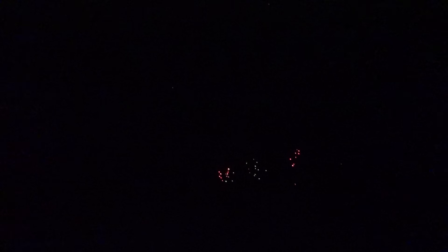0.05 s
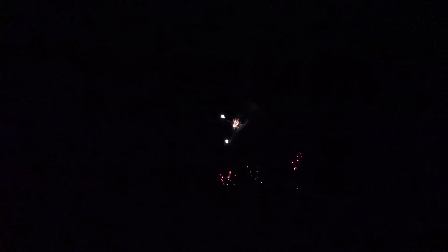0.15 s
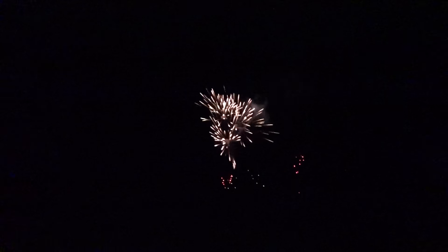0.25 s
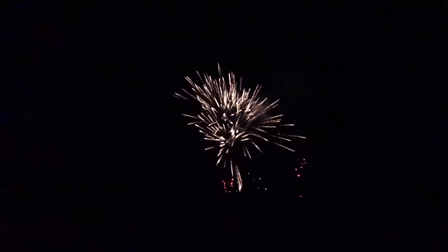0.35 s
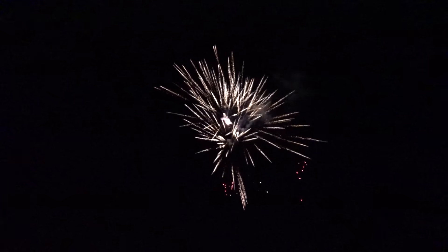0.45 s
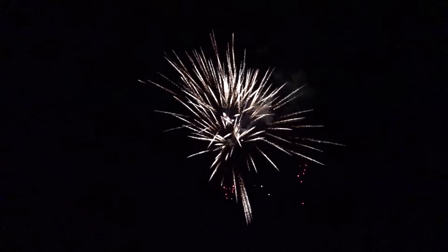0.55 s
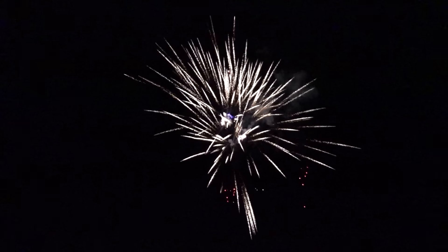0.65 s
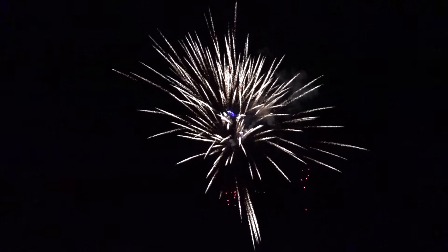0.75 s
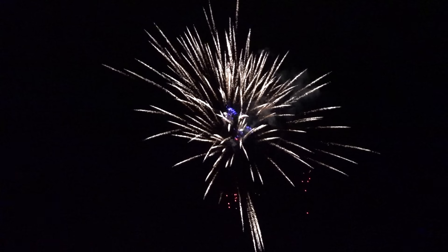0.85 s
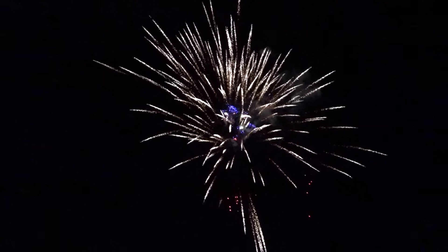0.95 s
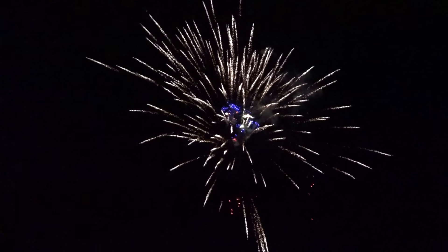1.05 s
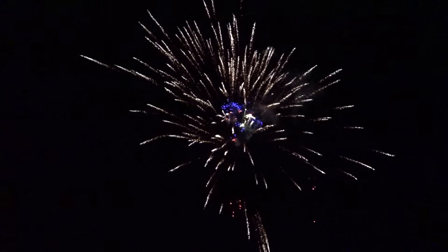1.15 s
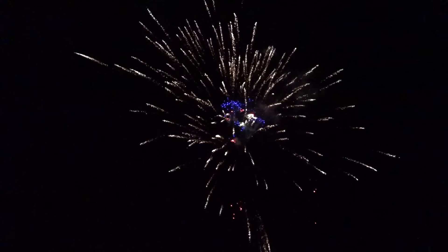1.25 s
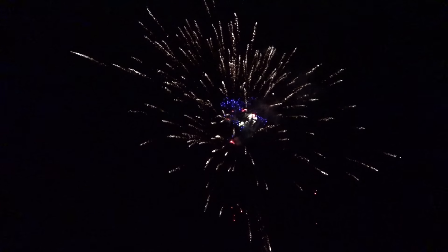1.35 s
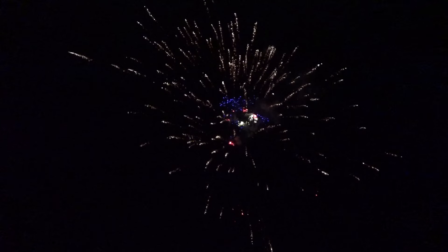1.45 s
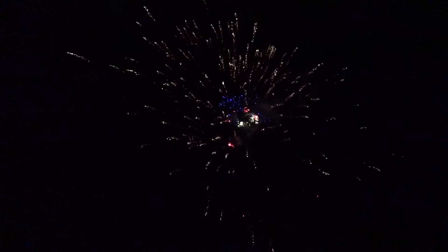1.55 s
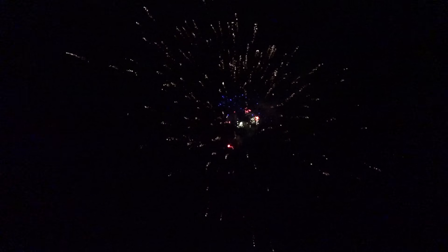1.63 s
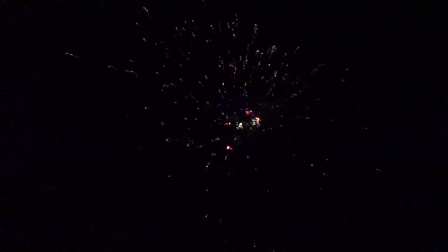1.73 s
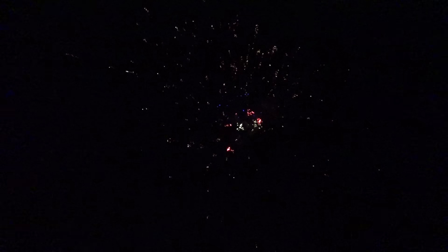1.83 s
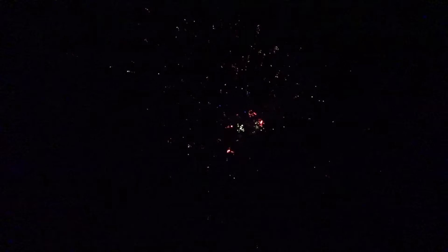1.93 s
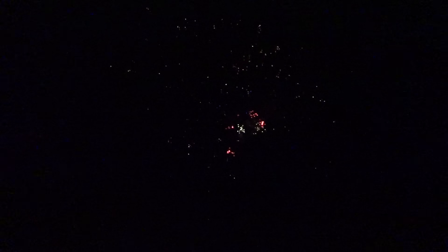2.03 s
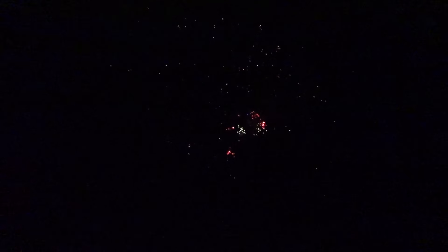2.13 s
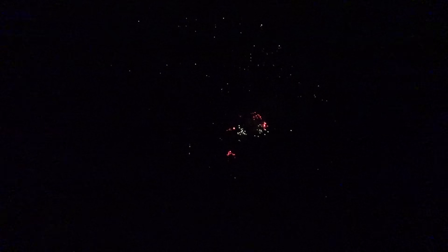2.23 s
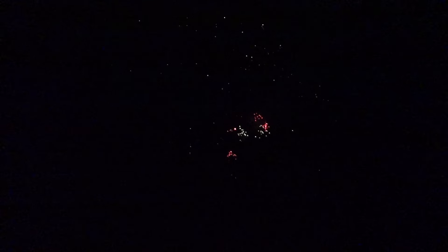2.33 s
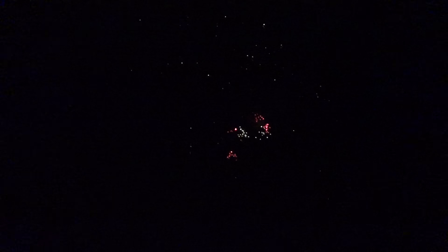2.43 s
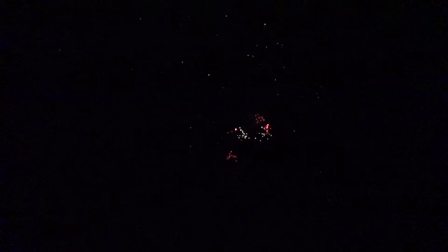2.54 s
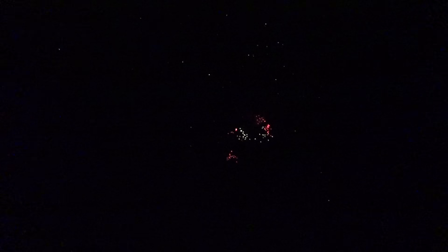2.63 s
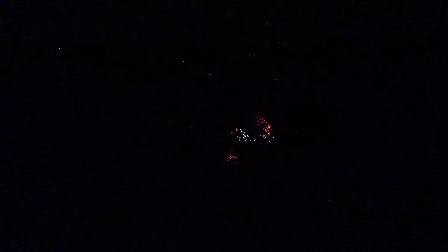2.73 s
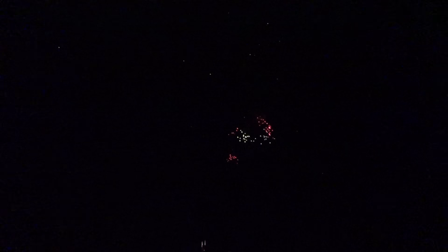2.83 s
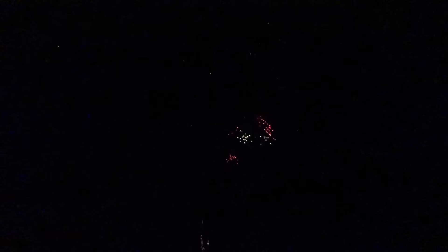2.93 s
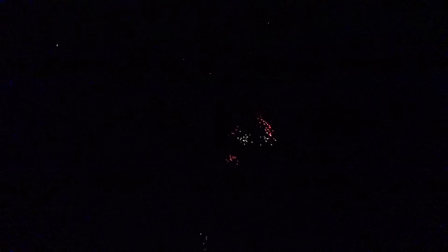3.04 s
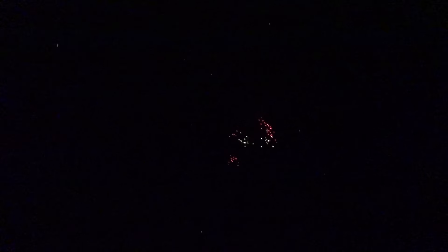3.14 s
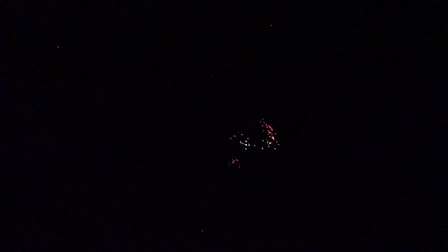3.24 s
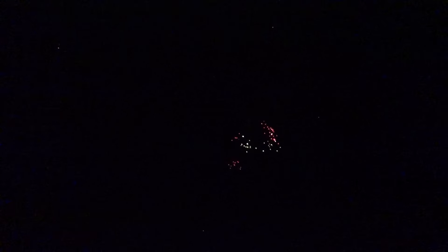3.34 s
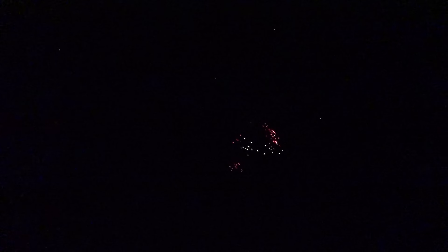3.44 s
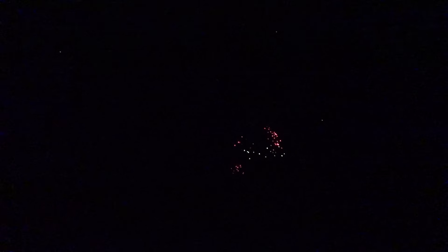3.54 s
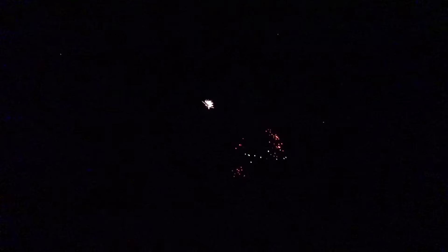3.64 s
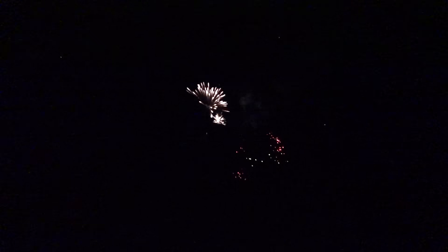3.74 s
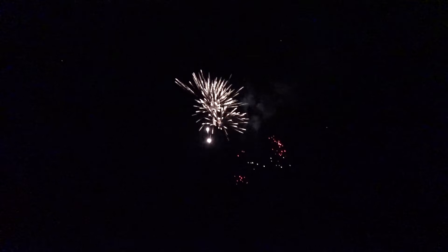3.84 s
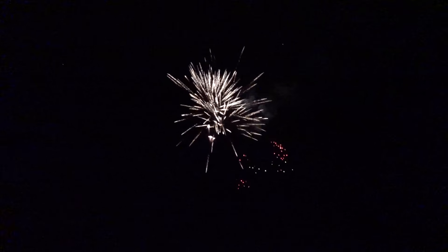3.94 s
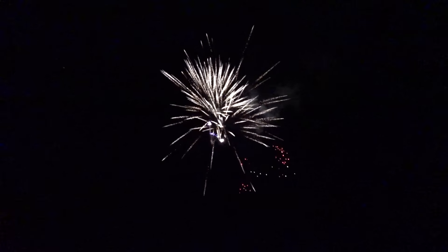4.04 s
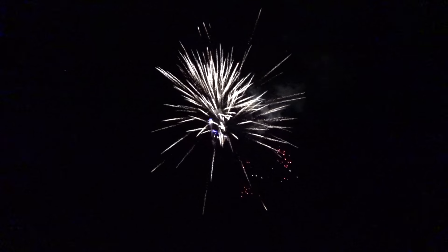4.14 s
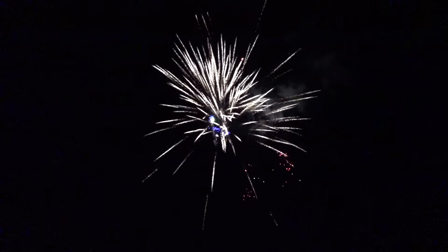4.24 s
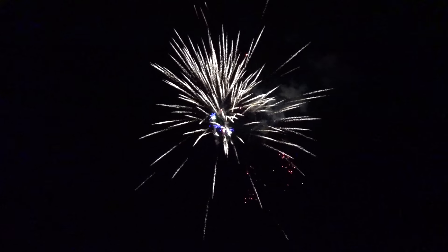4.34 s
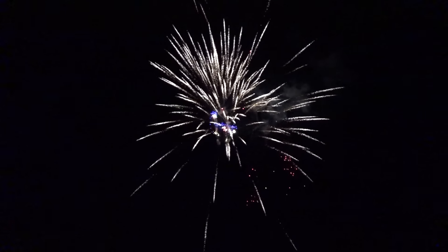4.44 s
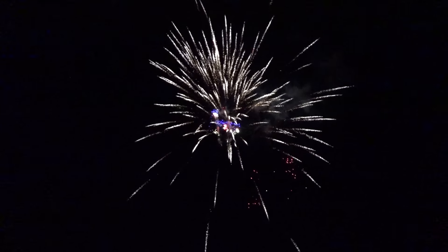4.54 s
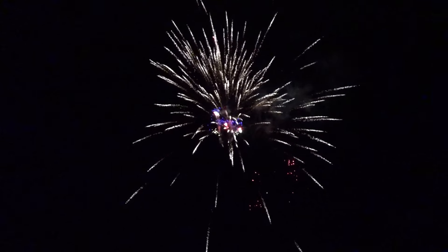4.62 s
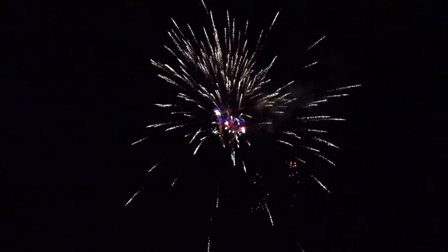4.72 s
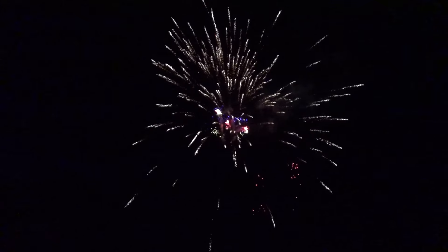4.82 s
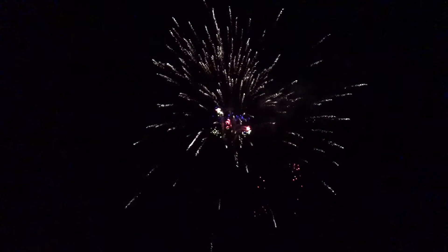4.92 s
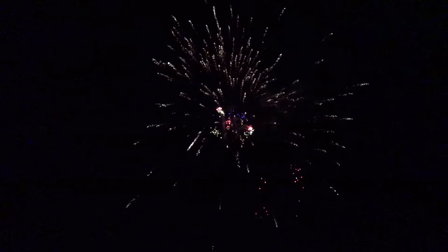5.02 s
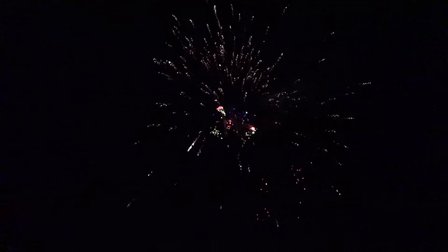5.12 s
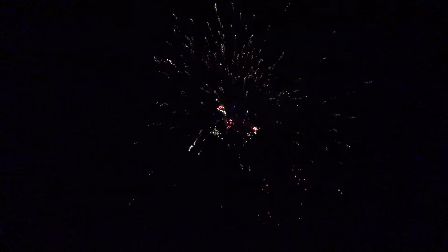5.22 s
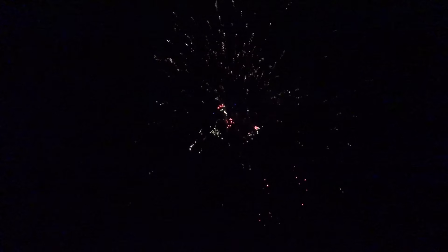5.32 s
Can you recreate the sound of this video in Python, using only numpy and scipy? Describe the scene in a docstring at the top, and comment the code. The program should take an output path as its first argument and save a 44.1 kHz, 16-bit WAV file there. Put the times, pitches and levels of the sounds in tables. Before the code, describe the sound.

Night, outdoors, among trees with walls and a fence nearby. A low murky hush and faint airy rush of climbing shells lead to 0.34 s, when three shells burst within about 20 ms as one brutal, clipped crack. The microphone's limiter ducks, then a bright crash from the trees swells back and sinks into a wide, uneven rolling rumble, with dull echo thuds around 0.7-1.25 s and a small snap near 0.6 s. The roll darkens and fades. From 2.67 to 2.89 s six launch charges thump rapidly, about 45 ms apart, with hard wall slaps and a brief buzzy fence echo. A low fluttering rush follows, with one sharp tick at 3.13 s. Bursts crack at 3.83, 3.92 and 3.97 s, a distinct stuttering triple, again overloading. Crashing echoes swell, thuds return around 4.3-4.85 s, and thunderous reverberation decays to the end, about 5.4 s.

```python
"""Three firework shells burst overhead at night, six more leave their tubes, then three burst again.
Each explosion is an N-wave; walls and a fence answer the launches as delayed, resonant copies.
Trees and far terrain roll the sound around as scattered noise with decays set by frequency.
Burning pieces snap, climbing shells rush, and low outdoor murk lies beneath.
Bursts and launches overload the microphone: its limiter ducks and lets the echoes swell back in."""
import sys
import numpy as np
from scipy import signal
from scipy.fft import rfft, irfft, next_fast_len
from scipy.io import wavfile
from scipy.ndimage import uniform_filter1d

SR = 44100
rng = np.random.default_rng(int(sys.argv[2]) if len(sys.argv) > 2 else 0)


def materialize(psi):
    """Save the field psi as 16-bit PCM at rate SR to the path in sys.argv[1].

    A 1-D psi becomes a single channel; in a 2-D psi each row is a channel.
    """
    bounded = np.clip(np.atleast_2d(psi).T, -1, 1)
    quanta = np.round(bounded * 32767).astype(np.int16)
    wavfile.write(sys.argv[1], SR, quanta)


N = 237017
TIME = np.arange(N) / SR
HZ = np.fft.rfftfreq(N, 1 / SR)

# shells bursting overhead: t/s, N-wave level/dB, overpressure/ms, ground echo delay/s,
# ground echo level/dB, level sent to the surroundings/dB
BURST_ROWS = [(0.3407, 22.5, 0.68, 0.0059, -2.5, -0.5), (0.3582, 23.5, 0.74, 0.0099, -5, -2.5),
              (0.362, 21, 0.76, 0.00146, -0.5, -4.5), (3.8263, 21.5, 0.54, 0.00606, -1.5, -0.5),
              (3.9211, 19.5, .58, .0057, -2.5, -1), (3.9703, 23.5, 0.75, 0.0063, -1.5, 1.5)]
# lift charges in the tubes: t/s, N-wave level/dB, overpressure/ms, level sent to the walls/dB
LAUNCH_ROWS = [(2.6657, 9, 1.03, 1.5), (2.7158, 8, 0.74, -2), (2.7632, 12, 1.06, -2.5),
               (2.8087, 10, 0.88, -5.5), (2.852, 12, 1.18, -2), (2.8929, 9.5, 1.2, -3.5)]


def bursts():
    """Blast waves: a shell's sudden release of gas drives an N-wave, heard directly and off the ground."""
    return thin(bangs(BURST_ROWS, softness=0.66, splinter_db=-7, splinter_s=0.0043), low_hz=101)


def bangs(rows, softness, splinter_db, splinter_s):
    """Ground reflection: each explosion arrives directly and again after a longer path."""
    out = np.zeros((2, N))
    for s, db, ms, delay, ground_db, *_ in rows:
        wave = amp(db) * shock(ms, softness)
        add(out, s, nearby(wave, splinter_db, splinter_s))
        add(out, s + delay, nearby(amp(ground_db) * wave, splinter_db, splinter_s))
    return out


def shock(ms, softness, front_ms=0.037):
    """N-wave: a steep front, a ramp into suction, and a softer rear shock."""
    t_ms = 1000 * np.arange(1024) / SR
    u = t_ms / ms
    front = 1 - np.exp(-t_ms / front_ms)
    rear = (1 - np.tanh((u - 2) / softness)) / 2
    return (1 - u) * rear * front


def nearby(wave, db, decay_s, hz=4200, width_hz=8000):
    """Near-field scattering: things beside the microphone splinter each front, differently per port."""
    t = np.arange(400) / SR
    taps = rng.standard_normal((2, len(t))) * np.exp(-t / decay_s)
    taps = resonate_twice(taps, hz, width_hz)
    taps /= np.linalg.norm(taps, axis=1, keepdims=True)
    splinters = signal.fftconvolve(wave[None], taps, axes=1)[:, :len(wave)]
    return wave + amp(db) * splinters


def launches():
    """Discrete reflection: thumps from the tubes return from walls and a fence, coloured and delayed."""
    # surfaces that throw each launch back: delay/s, level/dB, resonance centre f/Hz, resonance width/Hz
    walls = [(0.0183, -8.5, 260, 402), (0.0266, 0.5, 1490, 980), (0.073, -21, 220, 400),
             (.118, -20.5, 250, 450), (.249, -26, 301.4, 400), (.3765, -29, 400, 998),
             (0.4856, -27, 1680, 1110)]
    direct, out = np.zeros(N), np.zeros((2, N))
    for s, db, ms, sent_db in LAUNCH_ROWS:
        wave = amp(db) * shock(ms, softness=1.01)
        add(direct, s, wave)
        add(out, s, nearby(wave, db=-2.0, decay_s=0.0033))
        for delay, wall_db, hz, width_hz in walls:
            slap = amp(wall_db + sent_db) * resonate_twice(wave, hz, width_hz)
            add(out, s + delay, nearby(slap, db=-10.5, decay_s=0.0038))
    return thin(out + fence(direct), low_hz=103, top_hz=8900)


def fence(x, db=-16, growth=2.9, fade_s=0.028):
    """Repetition pitch: nearly evenly spaced posts answer in turn, a buzz that swells and sinks."""
    first_hz, last_hz, end_s = 492, 415, .162  # posts answering per second, and the last answer
    jitter_s = .000025
    t = np.arange(int(end_s * SR)) / SR
    passed = np.floor(np.cumsum(np.linspace(first_hz, last_hz, len(t))) / SR)
    delays = t[np.diff(passed, prepend=0) > 0]
    taps = np.zeros((2, SR // 4))
    for delay, (shift, size, left, right) in zip(delays, rng.standard_normal((len(delays), 4))):
        envelope = (delay / end_s) ** growth * min((end_s - delay) / fade_s, 1)
        strength = envelope * (1 + 0.64 * size + 0.27 * np.array([[left], [right]]))
        add(taps, delay + jitter_s * shift, strength)
    echo = signal.oaconvolve(x[None], taps, axes=1)[:, :N]
    # the buzz is strongest in two treble bands
    treble = resonate(echo, 2900, 1230) + 0.89 * resonate(echo, 3560, 1000)
    return amp(db) * resonate(treble, 3000, 7800)


def snaps():
    """Small blast waves: burning pieces give short N-waves, each with a ground reflection."""
    # t/s, N-wave level/dB, overpressure/ms, ground echo delay/s, ground echo level/dB
    snap_rows = [(.6132, -8.5, 0.24, .003, -13), (1.7235, -21.5, 0.19, 0.0026, -1),
                 (2.106, -21, 0.052, 0.00067, -8), (3.1255, 4, 0.064, 0.00263, -2),
                 (3.592, -33, 0.081, .003, 0)]
    sharp = bangs(snap_rows, softness=0.59, splinter_db=-10, splinter_s=0.0025)
    return thin(sharp, low_hz=600, top_hz=7350)


def echoes(tree_line_db=6, patchy_db=2.5):
    """Diffuse reverberation: trees return a bright crash, far terrain a long roll, decaying by frequency."""
    # colour of the echoes: f/Hz, near trees relative level/dB, near t60/s,
    # far terrain relative level/dB, far t60/s, launch echo relative level/dB
    octaves = [(45, -29, 1.5, -27, 12, -24), (94, -8, 0.87, -12.5, 8.9, -14),
               (174, -2.5, 1.72, -7, 4.45, -3.5), (412, -0.5, 1.3, -12, 5.68, -10),
               (767, -5, 0.83, -15.5, 5.56, -14.5), (1686, -11.5, 1.07, -18, 4.53, -19.5),
               (3175, -16, 1.01, -21.5, 2.7, -29), (6960, -24.5, 0.94, -35.5, 2.06, -39.5),
               (11000, -33, 0.36, -62, 4.7, -60)]
    tree_line_s, tree_spread_s = .072, .026
    far_rise_s, launch_t60 = 0.48, 0.67
    noise = unit(irfft(scatter(grain_db=1.8), N))
    hz, t, field = signal.stft(noise, SR, nperseg=1024, noverlap=768)
    near_db, near_t60, far_db, far_t60, launch_db = (read(octaves, hz, axis=k)[:, None] for k in range(1, 6))
    power = np.zeros(field.shape)
    for s, *_, sent_db in BURST_ROWS:
        age = np.maximum(t - s, 0)
        # the first trees answer together
        front_row = amp(tree_line_db * np.exp(-((age - tree_line_s) / tree_spread_s) ** 2))
        near = amp(near_db) * front_row * dying(age, near_t60, rise_s=0.022)
        far = amp(far_db) * dying(age, far_t60, far_rise_s)
        power += amp(sent_db) ** 2 * (near ** 2 + far ** 2)
    for s, *_ in LAUNCH_ROWS:
        age = np.maximum(t - s, 0)
        power += (amp(launch_db) * dying(age, launch_t60, rise_s=0.0063)) ** 2
    # uneven strength over frequency and time
    patches = uniform_filter1d(rng.standard_normal(field.shape), size=7, axis=0)
    patches = unit(uniform_filter1d(patches, size=6, axis=1))
    shaped = field * np.sqrt(power) * amp(patchy_db * patches)
    roll = signal.istft(shaped, nperseg=1024, noverlap=768)[1]
    return roll[:, :N] * flutter(depth_db=1.41, size=900)


def dying(age, t60, rise_s):
    """Exponential decay: an echo builds up, then falls 60 dB in each t60."""
    return (1 - np.exp(-(age / rise_s) ** 2)) * np.exp(-np.log(1000) * age / t60)


def returns(hill_octaves=0.67, thud_octaves=0.53, count=3):
    """Delayed scattering: hillsides and small reflectors answer each burst; a few echoes land as thuds."""
    # hillsides that answer every burst: delay/s, level/dB, centre f/Hz, spread/s
    hillsides = [(.32, -30, 306, 0.036), (.66, -35.5, 125, .055), (.76, -31, 225, 0.077),
                 (1, -35.5, 136, .06), (1.35, -43, 750, .03), (1.73, -40.5, 460, 0.069),
                 (2.15, -47, 520, .085), (2.05, -62, 1600, .12)]
    # hard echoes that stand out of the roll: t/s, level/dB, centre f/Hz, spread/s
    thuds = [(0.7276, -17, 328, 0.0025), (0.778, -29, 2750, 0.0052), (0.847, -22.5, 750, 0.0039),
             (1.169, -23, 172, 0.0075), (1.24, -22.5, 174, 0.014), (4.334, -20, 321, 0.0043),
             (4.69, -23, 227, 0.017), (4.778, -23, 405, 0.008), (4.845, -24, 164, .015),
             (5.265, -31.5, 740, 0.0025)]
    # small reflectors at random distances: nearest and farthest delay/s
    small_delays = (.25, 1.4)
    # small reflectors: lowest and highest centre f/Hz
    small_bands = (280, 2200)
    small_db, small_fade_db_per_s, small_spread_s = -29, 12.5, .004
    out = np.zeros((2, N))
    for s, *_, sent_db in BURST_ROWS:
        field = irfft(scatter(grain_db=3.5), N)
        for delay, db, hz, spread_s in hillsides:
            add(out, *swell(field, s + delay, db + sent_db, hz, spread_s, hill_octaves))
        for distance, colour in rng.random((count, 2)):
            delay = np.interp(distance, [0, 1], small_delays)
            hz = np.exp(np.interp(colour, [0, 1], np.log(small_bands)))
            db = small_db + sent_db - small_fade_db_per_s * delay  # the farther, the fainter
            add(out, *swell(field, s + delay, db, hz, small_spread_s, thud_octaves))
    field = irfft(scatter(grain_db=4.0), N)
    for row in thuds:
        add(out, *swell(field, *row, thud_octaves))
    return out


def swell(field, s, db, hz, spread_s, octaves):
    """Band-limited reflection: scattered sound that rises and falls around time s; gives start and sound."""
    half = next_fast_len(int(4 * spread_s * SR))
    offsets = np.arange(-half, half)
    piece = field.take(round(s * SR) + offsets, axis=1, mode="wrap")
    piece_hz = np.fft.rfftfreq(2 * half, 1 / SR)
    band = np.exp(-(np.log2((piece_hz + 1) / hz) / octaves) ** 2 / 2)
    window = np.exp(-(offsets / SR / spread_s) ** 2 / 2)
    sound = unit(window * irfft(rfft(piece) * band))
    return s - half / SR, amp(db) * sound * np.sqrt(np.mean(window ** 2))


def scatter(grain_db=0):
    """Spatial coherence: spectra of scattered sound at two ports; grain makes some reflections stand out."""
    # likeness of the two microphone ports: f/Hz, coherence
    likeness = [(40, 0.67), (120, 0.76), (500, 0.75), (1500, 0.8), (3500, 0.77), (7000, 0.2)]
    sizes = amp(grain_db * np.minimum(rng.exponential(1, N // 16 + 1), 3.5)).repeat(16)[:N]
    common, apart = rfft(rng.standard_normal((2, N)) * sizes)
    same = np.clip(read(likeness), 0, 1)
    return common * np.sqrt(1 + same) + np.array([[1], [-1]]) * apart * np.sqrt(1 - same)


def climbing():
    """Amplitude envelope: the rush builds after lift-off, holds, and stops about when the shells burst."""
    # volleys climbing on their fuses: lift-off t/s, end of climb t/s, level/dB
    climbs = [(-.6, .34, -43), (2.67, 3.785, -39.5)]
    rise_s, release_s = .35, 0.01
    level = np.zeros(N)
    for start, end, db in climbs:
        build = np.clip((TIME - start) / rise_s, 0, 1)
        level += amp(db) * build * np.exp(-np.maximum(TIME - end, 0) / release_s)
    return level


def air(night_db=-45):
    """Filtered noise: low outdoor murk, and the fluttering rush of shells on their way up."""
    # spectrum of the night air: f/Hz, relative level/dB
    night_colour = [(20, -3.5), (42, 6), (62, -5.5), (90, 7), (140, -2), (300, -12), (600, -15),
                    (1500, -24), (3000, -33.5), (6000, -34), (9000, -38), (11000, -47)]
    # spectrum of the climbing shells: f/Hz, relative level/dB
    rush_colour = [(40, -3), (100, -2), (170, 5), (260, -4.5), (400, -16.5), (900, -22.5), (2000, -27),
                   (4000, -32), (7000, -38), (11000, -56)]
    night = unit(irfft(scatter() * amp(read(night_colour)), N)) * flutter(depth_db=2.0, size=5000)
    rush = unit(irfft(scatter(grain_db=1) * amp(read(rush_colour)), N)) * flutter(depth_db=2.5, size=1500)
    return amp(night_db) * night + climbing() * rush


def flutter(depth_db, size):
    """Random modulation: a gain that wanders over about size samples."""
    wander = uniform_filter1d(uniform_filter1d(rng.standard_normal(N), size), size)
    return amp(depth_db * unit(wander))


def amp(db):
    """Logarithmic level: decibels to amplitude gain."""
    return 10 ** (np.asarray(db) / 20)


def unit(x):
    """Normalisation: scales to rms 1."""
    return x / np.sqrt(np.mean(x ** 2) + 1e-20)


def read(points, at_hz=HZ, axis=1):
    """Interpolation: joins one column of (f/Hz, value, ..) rows on a log-frequency axis."""
    columns = np.transpose(points)
    return np.interp(np.log(at_hz + 1), np.log(columns[0] + 1), columns[axis])


def add(mix, s, sound):
    """Superposition: mixes a sound in at time s."""
    part = mix[..., max(round(s * SR), 0):][..., :sound.shape[-1]]
    part += sound[..., :part.shape[-1]]


def resonate(x, hz, width_hz):
    """Resonance: one second-order peak of gain 1."""
    return signal.lfilter(*signal.iirpeak(hz, hz / width_hz, fs=SR), x)


def resonate_twice(x, hz, width_hz):
    """Cascaded resonance: two equal peaks in series, for steeper skirts."""
    return resonate(resonate(x, hz, width_hz), hz, width_hz)


def thin(x, low_hz, top_hz=9000):
    """Band-pass: a shock loses deep bass and its finest edge, and rebounds after the suction."""
    band = [low_hz, min(top_hz, SR / 2 - 1)]
    return signal.sosfilt(signal.butter(2, band, "bandpass", fs=SR, output="sos"), x)


def scene():
    """Superposition: shocks from straight ahead, echoes and air from all round."""
    surroundings = (echoes() + returns()) * amp([[.7], [-.7]])  # left and right trim/dB
    return bursts() + launches() + snaps() + surroundings + air()


def record(dry, threshold_db=-.5, recover_db_per_s=260, attack_s=0.0033):
    """Dynamic limiting: a limiter too slow for the shock fronts, soft clipping, then the band limit."""
    over_db = np.maximum(20 * np.log10(abs(dry).max(0) + 1e-9) - threshold_db, 0)
    # peak hold that falls at a steady rate
    fall = TIME * recover_db_per_s
    held_db = np.maximum.accumulate(over_db + fall) - fall
    r = np.exp(-1 / (SR * attack_s))
    ducked = dry * amp(-signal.lfilter([1 - r], [1, -r], held_db))
    clipped = ducked / (1 + ducked ** 6) ** (1 / 6)
    lowpass = signal.firwin(201, 11100, window=("kaiser", 7), fs=SR)  # edge f/Hz
    return signal.oaconvolve(clipped, lowpass[None], "same")


dry = scene()
out = record(dry)
materialize(out)
```